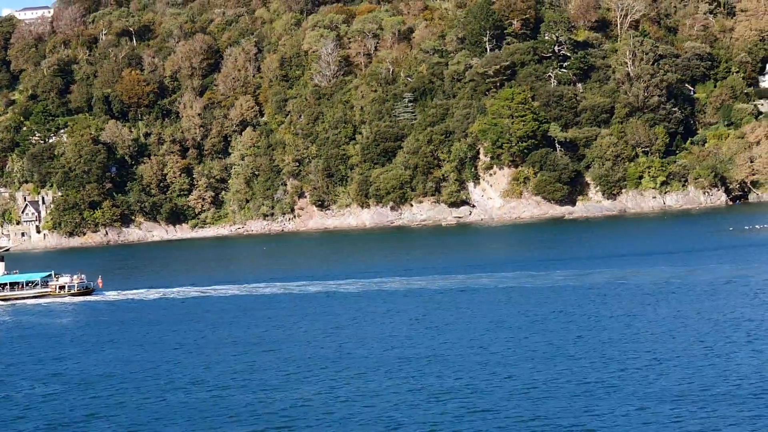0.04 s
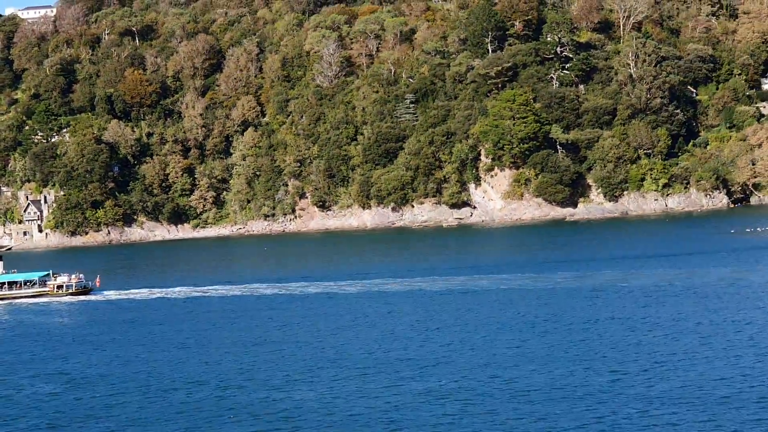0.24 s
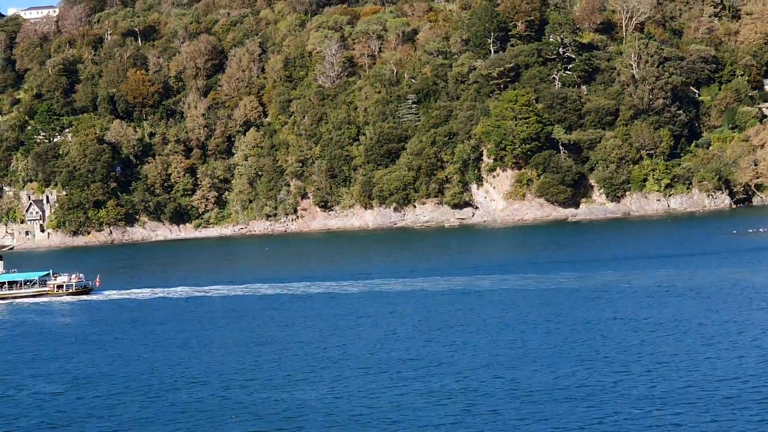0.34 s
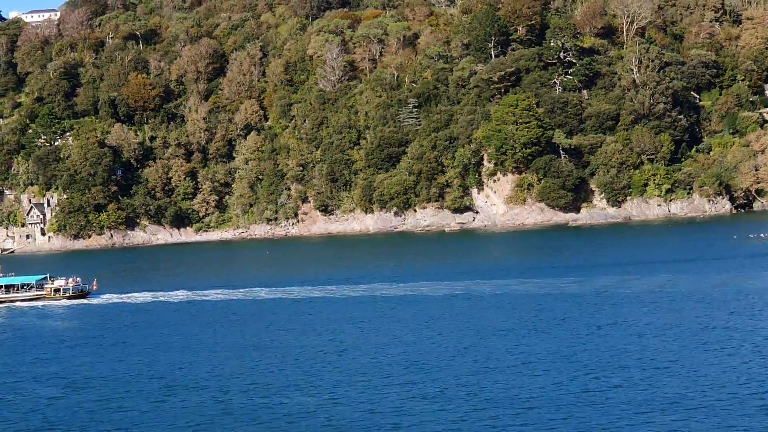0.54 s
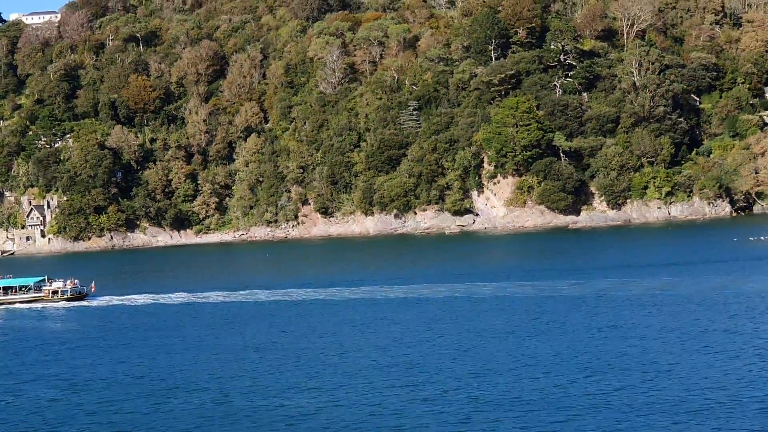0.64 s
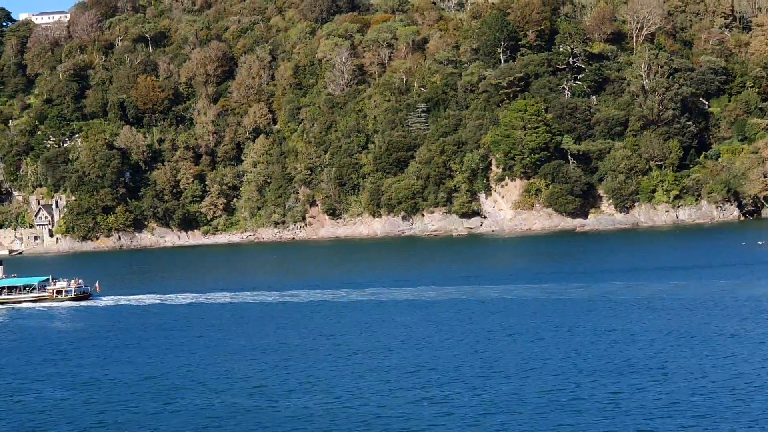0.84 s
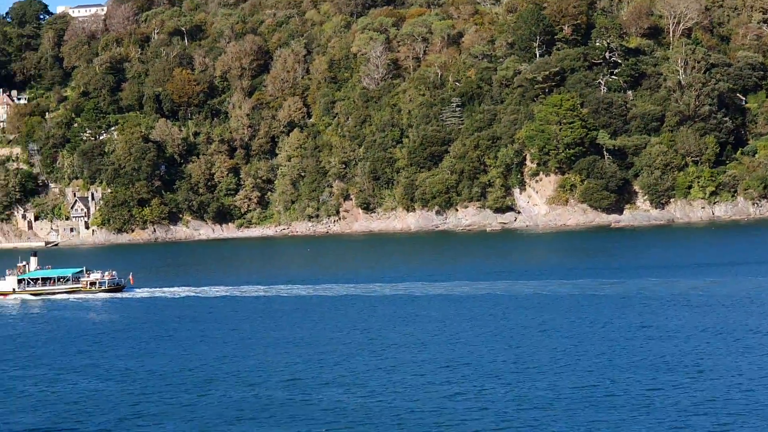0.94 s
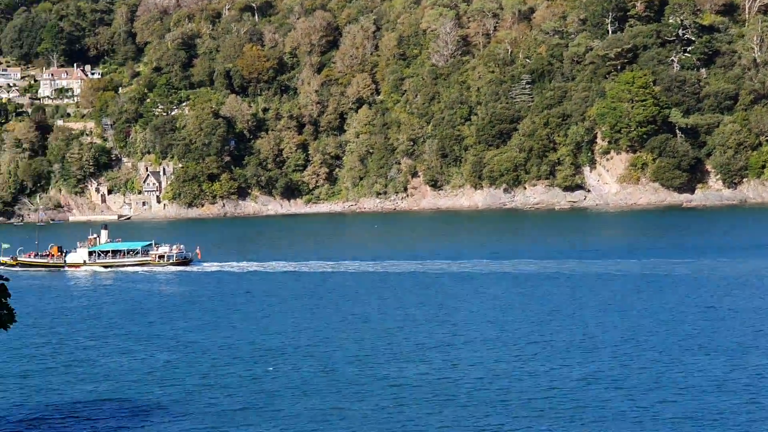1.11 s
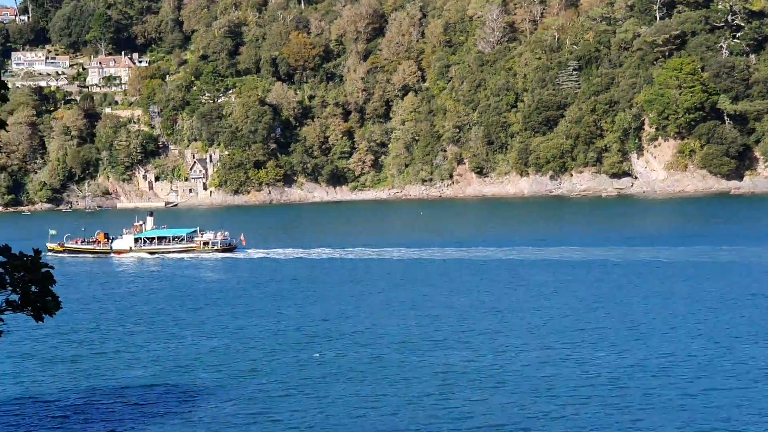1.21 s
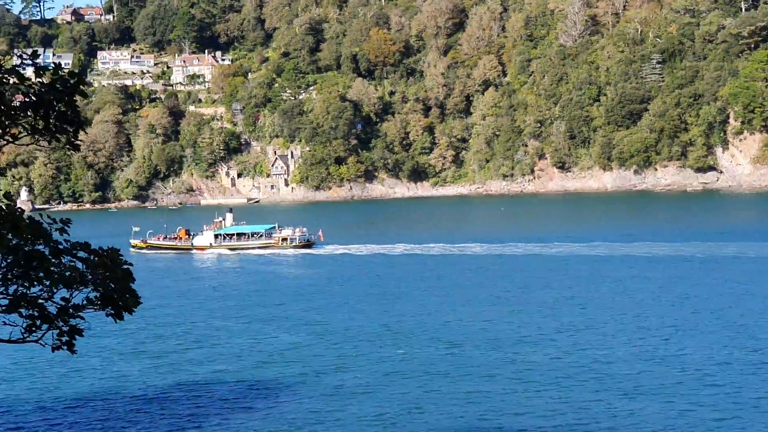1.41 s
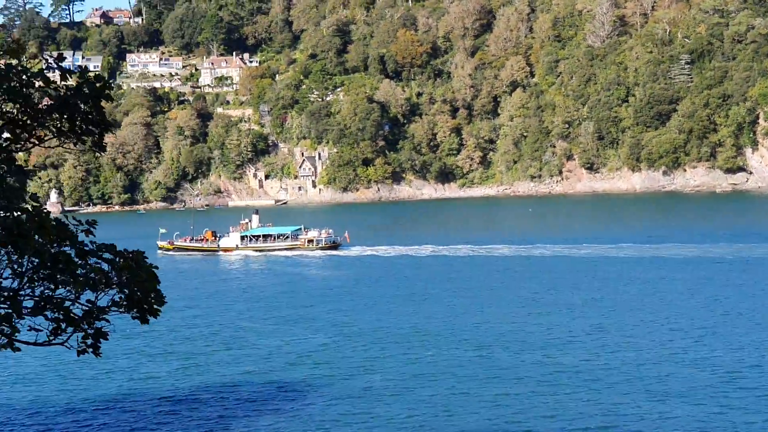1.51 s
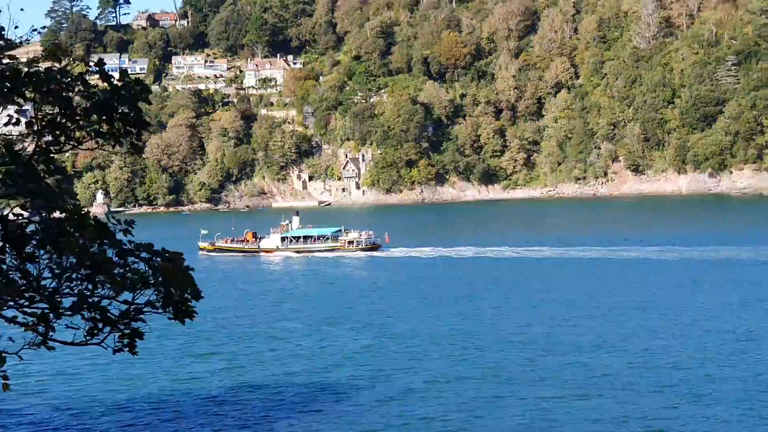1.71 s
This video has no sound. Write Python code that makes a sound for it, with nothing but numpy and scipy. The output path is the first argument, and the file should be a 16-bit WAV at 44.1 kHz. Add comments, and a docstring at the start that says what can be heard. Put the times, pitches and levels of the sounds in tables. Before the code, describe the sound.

Gusty wind rumbles, flutters and thumps right on the microphone outdoors. One short hollow handling bump comes early as the gust builds, while leaves and water hiss softly in the distance.

```python
"""A low rumble of gusty wind builds across a camera's two microphone ports, above a wooded river.
Eddies rumble, flutter and rush at each port, large ones thump, and fast air fizzes at one port or
the other. The camera takes one hollow bump early on; a faint whistle rises near the end.
Behind it all sits a soft hiss of leaves and water."""
import sys
import numpy as np
from scipy import signal
from scipy.fft import rfft, irfft
from scipy.io import wavfile
from scipy.ndimage import uniform_filter1d

SR = 44100
rng = np.random.default_rng(int(sys.argv[2]) if len(sys.argv) > 2 else 0)


def wav_out(sig):
    """Save sig, one row per channel (or a flat mono array), as 16-bit PCM at SR to the path in sys.argv[1]."""
    wavfile.write(sys.argv[1], SR, np.round(np.clip(np.atleast_2d(sig).T, -1, 1) * 32767).astype(np.int16))


N = 77175
T = np.arange(N) / SR

# gust envelopes of the large, middling and small eddies (time [s], level [dB])
RUMBLE_LEVEL = [(0, -51), (.06, -42), (.11, -56), (.2, -42), (.24, -30), (.3, -28.5), (.38, -26),
                (.44, -26.5), (.6, -30.5), (.72, -35.5), (.8, -40), (.92, -37.5), (1.0, -27), (1.1, -35.5),
                (1.18, -49), (1.23, -37), (1.3, -35.5), (1.34, -49), (1.37, -38), (1.49, -27.5),
                (1.53, -51.5), (1.6, -45.5), (1.64, -43.5), (1.75, -44.5)]
FLUTTER_LEVEL = [(0, -78), (.11, -53.5), (.2, -41.5), (.28, -31), (.45, -28), (.55, -29), (.61, -33.5),
                 (.76, -27.5), (.92, -33), (1.1, -28.5), (1.17, -44), (1.23, -30.5), (1.27, -38.5),
                 (1.305, -35), (1.335, -46), (1.39, -40), (1.46, -32), (1.56, -39), (1.635, -46.5),
                 (1.69, -33.5), (1.75, -56)]
RUSH_LEVEL = [(0, -80), (.19, -54), (.25, -33.5), (.3, -35), (.38, -42), (.44, -32.5), (.5, -46),
              (.55, -37.5), (.6, -50.5), (.68, -42), (.75, -30.5), (.9, -34), (.99, -39), (1.06, -30.5),
              (1.12, -38.5), (1.17, -48.5), (1.23, -57), (1.34, -53), (1.42, -36.5), (1.5, -44.5),
              (1.58, -51.5), (1.63, -60), (1.75, -50)]
# tone of the same three sizes of eddy (frequency [Hz], relative level [dB])
RUMBLE_EQ = [(12, -27), (28, -33), (45, -8), (68, -7.5), (100, -3.5), (160, -22), (300, -44), (900, -85)]
FLUTTER_EQ = [(50, -2), (110, -5), (180, 2.5), (300, -3), (450, -6.5), (700, -27.5), (1200, -47.5),
              (3000, -72)]
RUSH_EQ = [(150, -17), (380, 2), (550, -3), (760, -0.5), (1000, -8.5), (1400, -17.5), (2200, -39.5),
           (5000, -54)]
# which port the rush favours (time [s], left minus right [dB])
RUSH_PAN = [(0, 3.5), (.62, -4.5), (.8, -3), (.9, -8.5), (1.05, -11), (1.15, 3), (1.45, 9.5), (1.75, -4)]
# sudden puffs within the rush (time [s], half length [s], level [dB], left minus right [dB])
PUFFS = [(.426, 0.006, -28.5, 0), (.46, 0.0033, -31.5, -5.5), (.56, 0.01, -34, 1), (.641, 0.0056, -31.5, 1),
         (.963, 0.013, -36.5, -11), (1.235, 0.0082, -40.5, 9), (1.305, 0.011, -46, -5),
         (1.443, 0.0068, -36, -19), (1.522, 0.0083, -43, -3), (1.554, 0.005, -41.5, 14),
         (1.703, 0.0053, -35, -3)]
# large eddies that thump (time [s], pitch [Hz], level [dB], ring [cycles], left minus right [dB])
BUFFETS = [(0.039, 82, -31, 0.81, -19), (.148, 97, -31, 0.3, -5), (.198, 100, -29.5, 0.38, 21),
           (0.316, 98, -18, .4, 0), (0.405, 80.4, -15, 0.29, -29), (0.48, 129, -18, .35, -14),
           (0.578, 117, -27, 0.36, 0), (0.6416, 190, -16, 0.75, 2), (0.676, 75, -20.5, .45, 0),
           (0.7328, 132, -17.5, 0.61, 32), (0.7896, 86, -19, 0.77, 8), (0.8483, 191, -18, 0.2, 5),
           (0.976, 153, -21.5, 0.16, 5), (0.997, 85, -23, .45, 1), (1.103, 150, -23, 0.3, 18),
           (1.1153, 86, -10.5, 1.38, 1), (1.299, 130, -26, 0.26, -10), (1.3619, 84.4, -23.5, 0.43, 18),
           (1.452, 190, -16.5, 0.35, -1), (1.472, 130, -21.5, 1.16, -12), (1.499, 110, -28, .5, -16),
           (1.566, 89, -28, 0.66, -8), (1.606, 90, -29.5, 0.64, -6)]
# bursts of fast air (time [s], half length [s], level [dB], left minus right [dB])
FIZZES = [(.43, 0.0084, -48, 5), (0.693, 0.0071, -38, -14), (0.76, 0.027, -41, -12),
          (.897, 0.035, -34, -29), (1.033, .021, -33.5, -16), (1.224, 0.0053, -44, -1),
          (1.414, 0.0017, -32.5, 33)]
# tone of that fast air (frequency [Hz], relative level [dB])
FIZZ_EQ = [(300, -15), (750, 13), (1400, 6), (2200, 1.5), (3800, -6.5), (5500, -20), (9000, -36),
           (15000, -45)]
# the two knocks of the bump (time [s], pitch [Hz], level [dB], delay at the right port [s])
KNOCKS = [(0.2302, 657, -3, 0.0013), (0.2368, 417, -17, .0002)]
# resonances of the casing (frequency [Hz], level against the knock [dB], 60 dB decay time [s])
CASING_MODES = [(348, -18, 0.036), (790, -16.5, 0.014)]
# tone of the leaves and water, and of the fine hiss on top (frequency [Hz], relative level [dB])
LEAVES_EQ = [(100, -2), (250, 5.5), (550, 4.5), (770, 7), (950, 3.5), (1300, 2.5), (2200, 3), (3000, 0),
             (4000, 1.5), (5100, -6), (6500, -10.5), (8000, -32), (15000, -39)]
HISS_EQ = [(3000, -32), (5000, -11), (6500, 0.5), (8000, -2), (10500, -2.5), (13000, -3), (15500, -10.5)]
# envelope of the leaves and water (time [s], level [dB])
LEAVES_LEVEL = [(0, -42.5), (.1, -43), (.18, -46), (.3, -41), (.4, -43), (.51, -45.5), (.62, -44.5),
                (.88, -45), (1.1, -46.5), (1.19, -50.5), (1.23, -48), (1.27, -48.5), (1.39, -50.5),
                (1.47, -47), (1.54, -49), (1.6, -47.5), (1.67, -50), (1.75, -51.5)]
# envelope of the fine hiss (time [s], level before trim [dB])
HISS_LEVEL = [(0.0, -58), (0.038, -56.5), (0.16, -57.5), (0.38, -55.5), (0.502, -58), (0.77, -57.5),
              (1.032, -58.5), (1.14, -61), (1.75, -61.5)]


def wind():
    """Three sizes of eddy churn at each port; the smallest also come in puffs."""
    rumble = envelope(RUMBLE_LEVEL) * turbulence(RUMBLE_EQ, shared=.03, lumpy_db=5.5, lump_hz=12)
    flutter = envelope(FLUTTER_LEVEL) * turbulence(FLUTTER_EQ, shared=.048, lumpy_db=6.5, lump_hz=32.2)
    rush_gain = envelope(RUSH_LEVEL) * pan(curve(RUSH_PAN)) + bursts(PUFFS)
    rush = rush_gain * turbulence(RUSH_EQ, shared=.019, lumpy_db=3.5, lump_hz=58.5)
    return rumble + flutter + rush


def buffets():
    """A large eddy sucks at both ports, hardest at its core; the pressure swings back ever slower."""
    rise_cycles, pitch_sag = .51, .23
    core_db, core_cycles = -8, .16
    out = np.zeros((2, N))
    for start, hz, db, ring_cycles, side_db in BUFFETS:
        port_lag_s = .00042 * rng.standard_normal((2, 1))
        cycles = (T - start - port_lag_s) * hz
        sagged = cycles / (1 + pitch_sag * np.sqrt(np.maximum(cycles, 0)))
        swell = np.exp(-(sagged / np.where(cycles < 0, rise_cycles, ring_cycles)) ** 2)
        swing = swell * np.cos(2 * np.pi * sagged)
        off_centre = (cycles / core_cycles) ** 2
        core = amp(core_db) * (1 - 2 * off_centre) * np.exp(-off_centre)
        out -= amp(db) * pan(side_db) * (swing + core)
    return out


def fizz():
    """The fastest air tears at the edge of a port."""
    return bursts(FIZZES) * turbulence(FIZZ_EQ, shared=0, lumpy_db=5.5, lump_hz=129)


def bump():
    """A short hollow knock on a low push, after which the casing rings briefly."""
    knock_cycles, overtone_ratio, overtone_db = .69, 2.34, -23.5
    push_db, push_hz, push_s = -18, 283, .0066
    out = np.zeros((2, N))
    for start, hz, db, lag in KNOCKS:
        t = T - start - np.array([[0], [lag]])
        phase = 2 * np.pi * hz * t
        tone = np.cos(phase) + amp(overtone_db) * np.cos(overtone_ratio * phase)
        knock = np.exp(-(t * hz / knock_cycles) ** 2) * tone
        push = amp(push_db) * np.exp(-(t / push_s) ** 2) * np.cos(2 * np.pi * push_hz * t)
        age = np.maximum(t, 0)
        ring = sum(amp(mode_db - 60 * age / t60) * np.sin(2 * np.pi * mode_hz * age)
                   for mode_hz, mode_db, t60 in CASING_MODES)
        out += amp(db) * (knock + push + ring)
    return out


def whistle():
    """A faint whistle rises as a gust dies away, roughened by a fast waver in pitch."""
    peak_s, half_s, level_db = 1.515, .042, -49
    centre_hz, rise_hz_per_s, waver = 1090, 500, .05
    glide = centre_hz + rise_hz_per_s * (T - peak_s)
    pitch = glide * (1 + waver * wobble(rate_hz=90, shared=.8)[0])
    tone = unit(np.sin(2 * np.pi * np.cumsum(pitch) / SR))
    return amp(level_db) * np.exp(-((T - peak_s) / half_s) ** 2) * tone


def leaves_and_water():
    """The background bed: leaves and water hiss softly, with a finer hiss on top."""
    hiss_trim_db = 2.5
    leaves = envelope(LEAVES_LEVEL) * turbulence(LEAVES_EQ, shared=.042, lumpy_db=2.15, lump_hz=33)
    hiss = envelope(HISS_LEVEL) * turbulence(HISS_EQ, shared=0, lumpy_db=1, lump_hz=40)
    return leaves + amp(hiss_trim_db) * hiss


def turbulence(eq, shared, lumpy_db, lump_hz):
    """Air pressure that comes in short lumps while its mean strength holds steady."""
    lumpy = noise(shared) * amp(lumpy_db * np.tanh(wobble(lump_hz, shared=.61)))
    pressure = colour(lumpy, eq)
    power = uniform_filter1d(pressure ** 2, size=2200, axis=1).mean(0)  # 50 ms average
    return pressure / np.sqrt(power + 1e-9)


def bursts(rows):
    """Left and right gain of short bell-shaped bursts of air."""
    return sum(amp(db) * pan(side_db) * np.exp(-.5 * ((T - peak_s) / half_s) ** 2)
               for peak_s, half_s, db, side_db in rows)


def noise(shared):
    """White noise at two ports, with a share of its power common to both."""
    white = rng.standard_normal((3, N))
    return np.sqrt(shared) * white[2] + np.sqrt(1 - shared) * white[:2]


def wobble(rate_hz, shared):
    """Random modulation around a rate at two ports, rms 1."""
    f = np.fft.rfftfreq(N, 1 / SR) / rate_hz
    return unit(irfft(rfft(noise(shared)) * f / (1 + f ** 4), N))


def colour(x, eq):
    """Shapes the tone with an EQ curve, to rms 1."""
    hz, db = np.transpose(eq)
    f = np.fft.rfftfreq(N, 1 / SR)
    gain = amp(np.interp(np.log(f + 1), np.log(hz), db))
    return unit(irfft(rfft(x) * gain, N))


def pan(side_db):
    """Left and right gains of constant power."""
    gains = amp(np.array([[.5], [-.5]]) * side_db)
    return gains / np.sqrt(np.mean(gains ** 2, 0))


def curve(points):
    """Joins breakpoints in time by straight lines."""
    return np.interp(T, *np.transpose(points))


def envelope(points):
    """Gain that follows (time [s], level [dB]) breakpoints."""
    return amp(curve(points))


def amp(db):
    """Decibels to gain."""
    return 10 ** (np.asarray(db) / 20)


def unit(x):
    """Scales to rms 1."""
    return x / np.sqrt(np.mean(x ** 2) + 1e-20)


def scene():
    """Wind and bump right on the microphone, over the distant bed."""
    return wind() + buffets() + fizz() + whistle() + bump() + leaves_and_water()


def record(dry):
    """A steep high cut takes off the very top."""
    cutoff_hz = 15850
    high_cut = signal.firwin(511, cutoff_hz, window=("kaiser", 9), fs=SR)
    return signal.oaconvolve(dry, high_cut[None], "same", axes=1)


dry = scene()
out = record(dry)
wav_out(out)
```